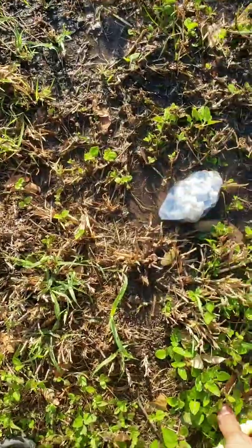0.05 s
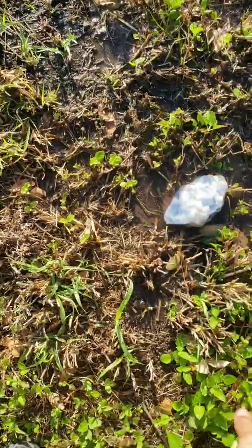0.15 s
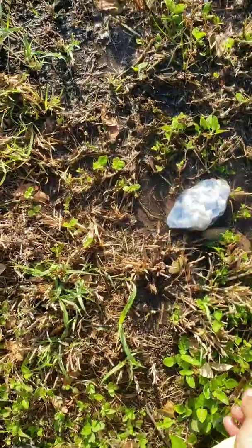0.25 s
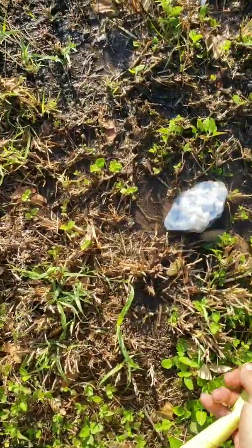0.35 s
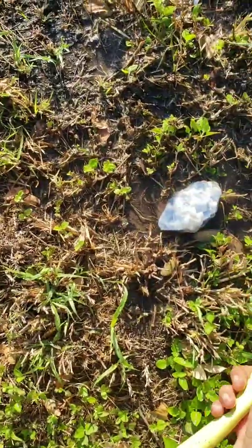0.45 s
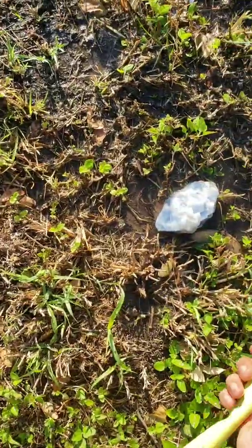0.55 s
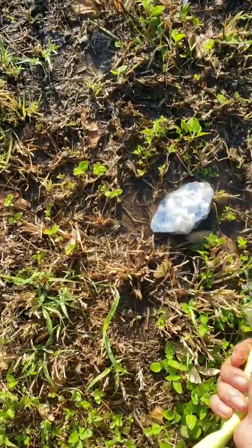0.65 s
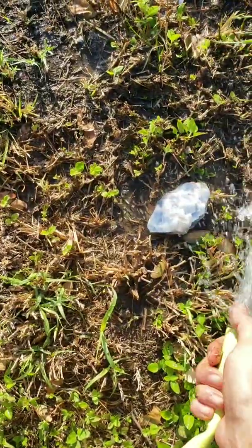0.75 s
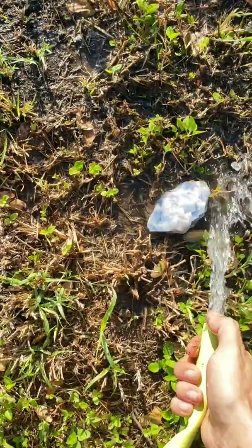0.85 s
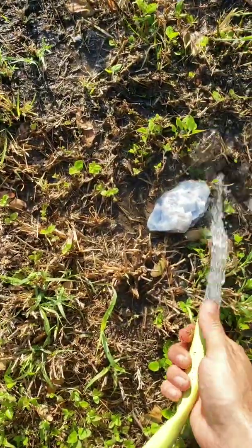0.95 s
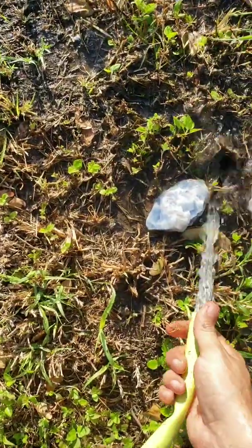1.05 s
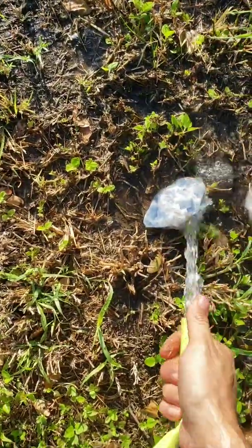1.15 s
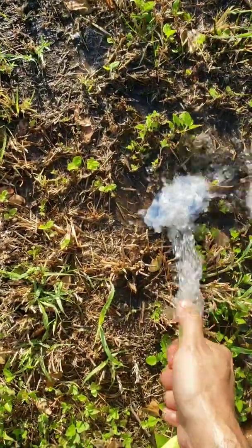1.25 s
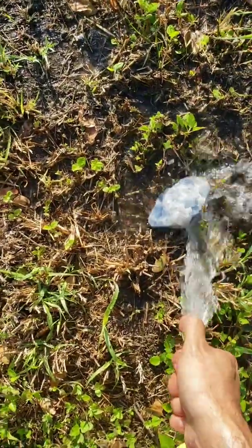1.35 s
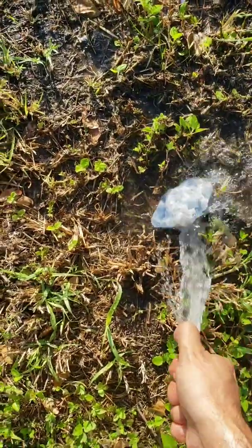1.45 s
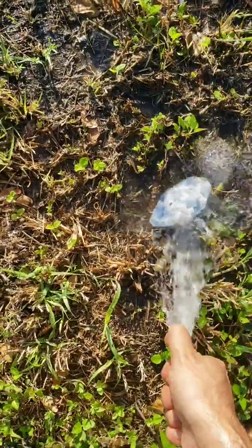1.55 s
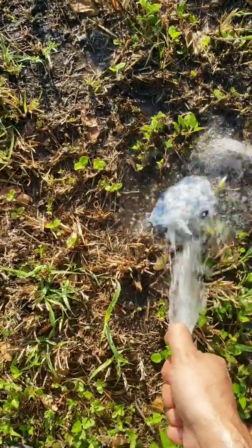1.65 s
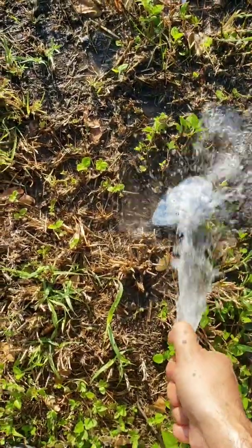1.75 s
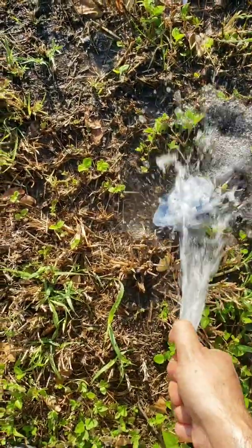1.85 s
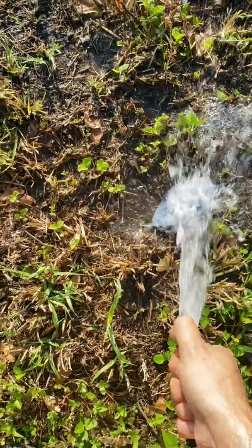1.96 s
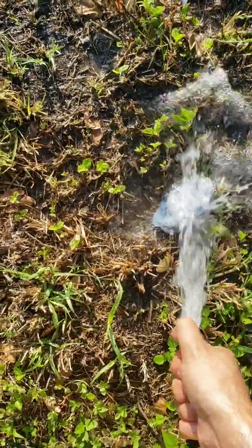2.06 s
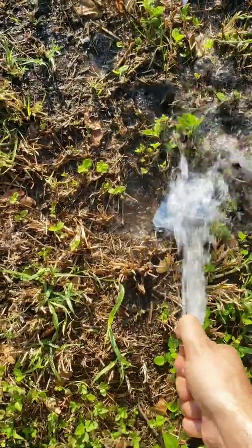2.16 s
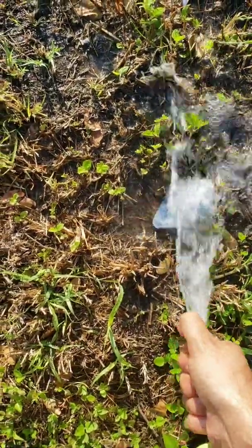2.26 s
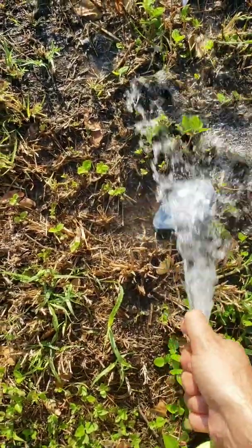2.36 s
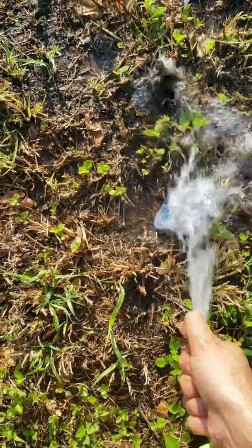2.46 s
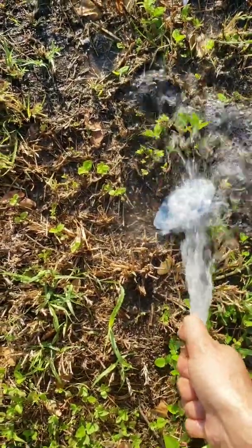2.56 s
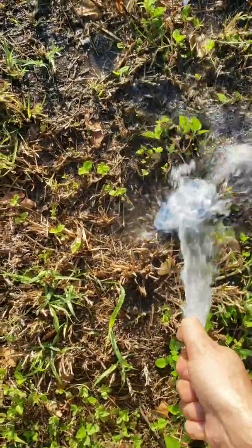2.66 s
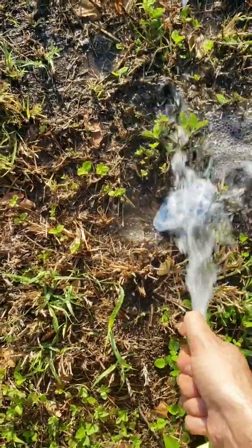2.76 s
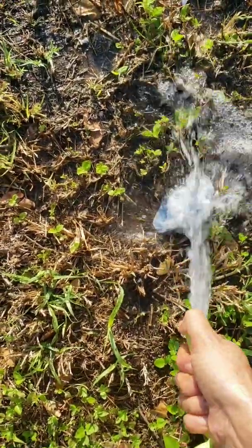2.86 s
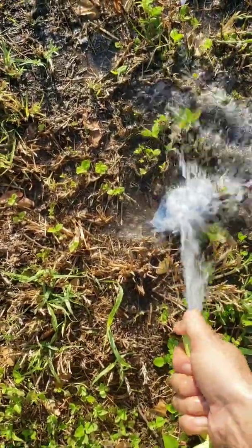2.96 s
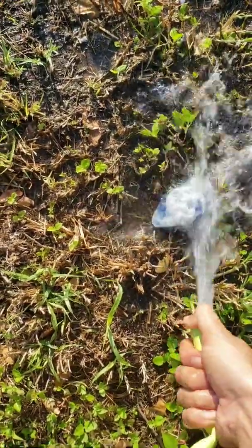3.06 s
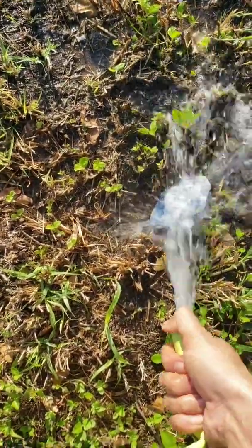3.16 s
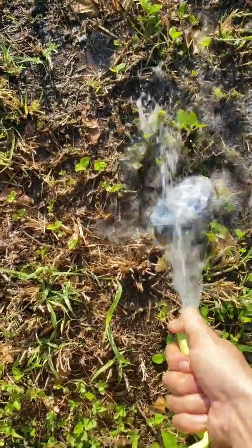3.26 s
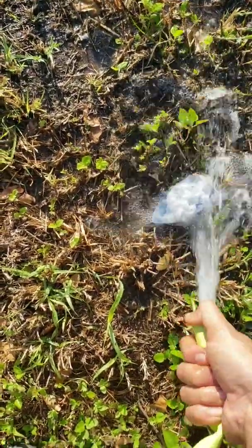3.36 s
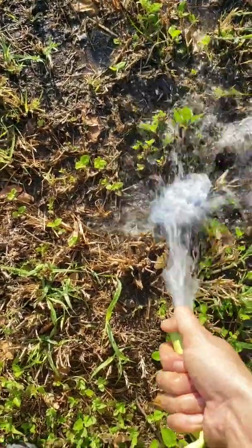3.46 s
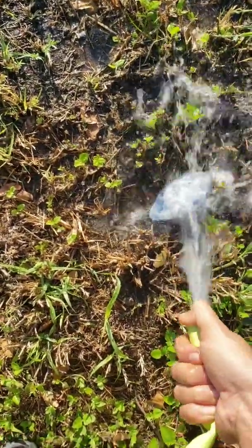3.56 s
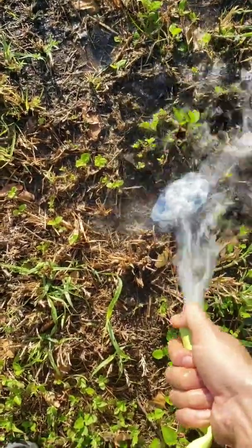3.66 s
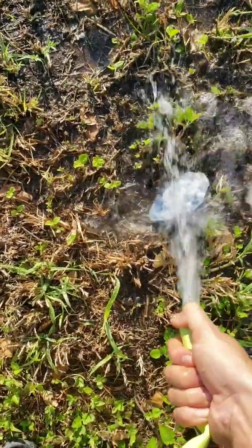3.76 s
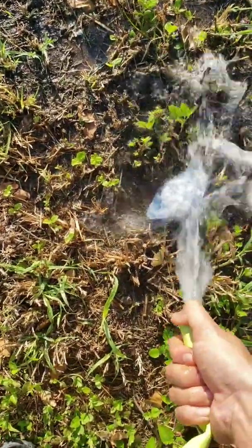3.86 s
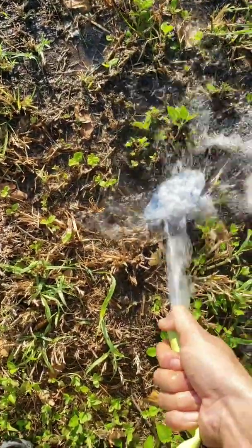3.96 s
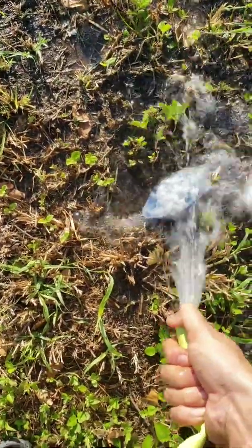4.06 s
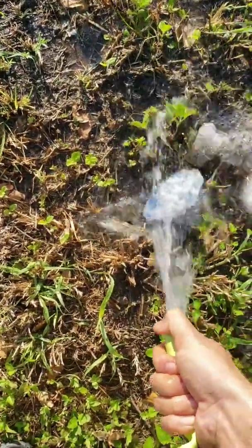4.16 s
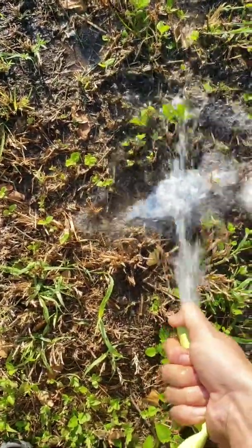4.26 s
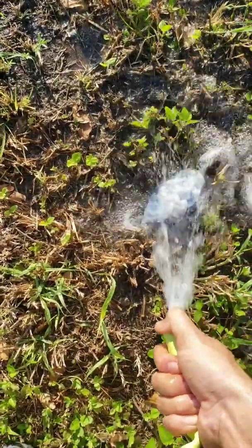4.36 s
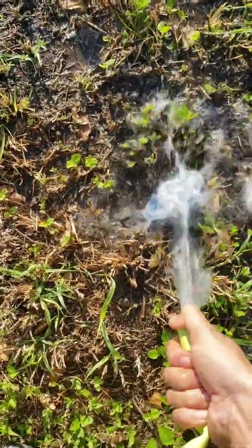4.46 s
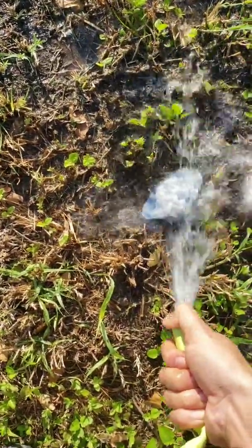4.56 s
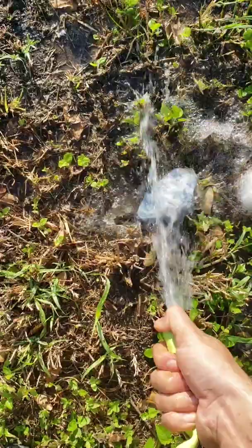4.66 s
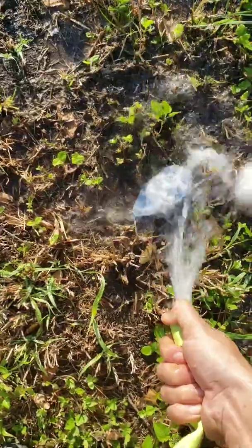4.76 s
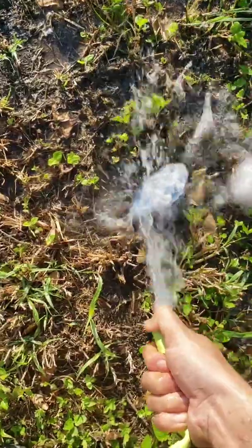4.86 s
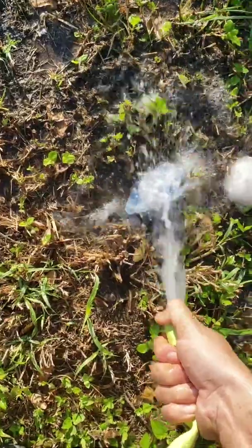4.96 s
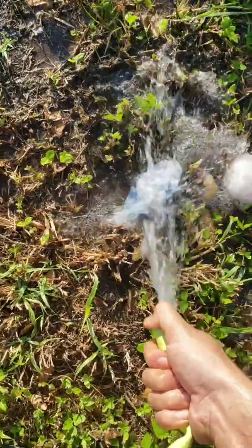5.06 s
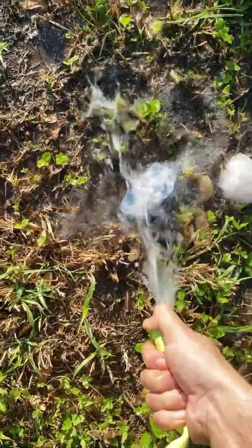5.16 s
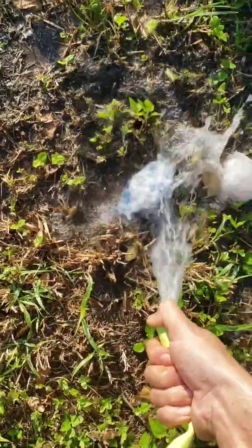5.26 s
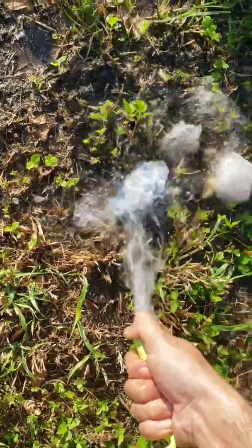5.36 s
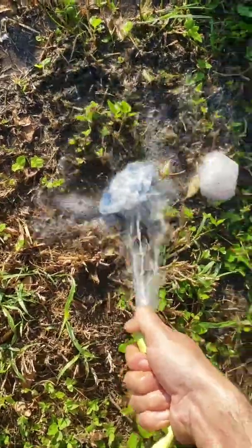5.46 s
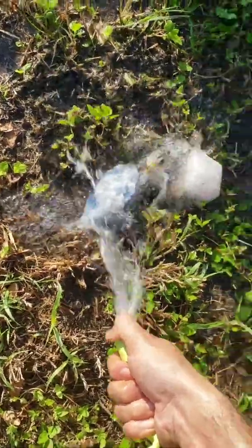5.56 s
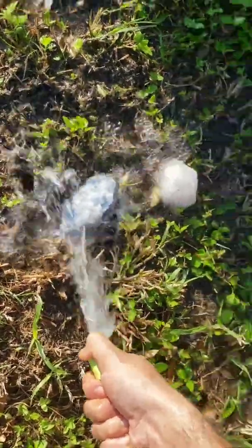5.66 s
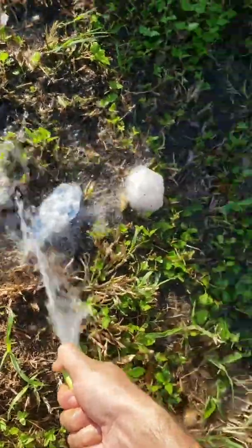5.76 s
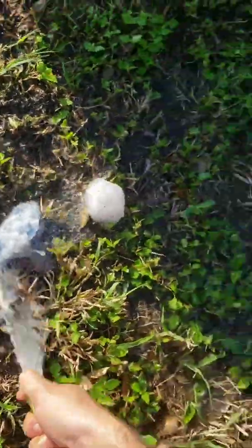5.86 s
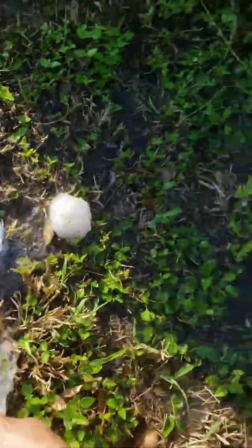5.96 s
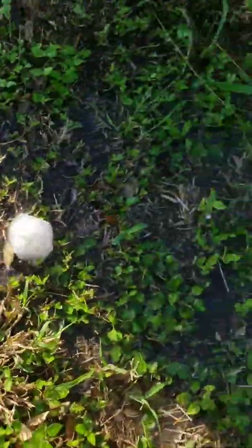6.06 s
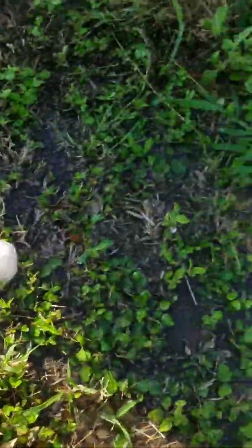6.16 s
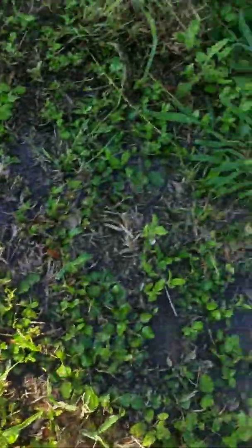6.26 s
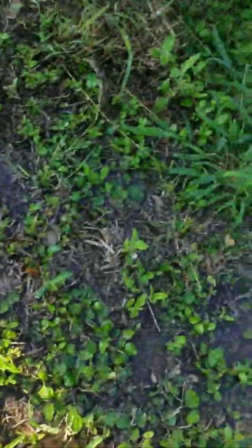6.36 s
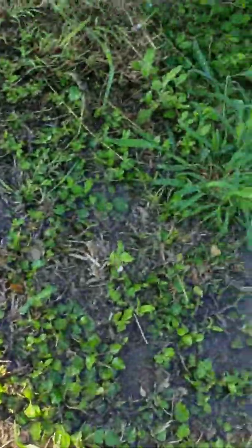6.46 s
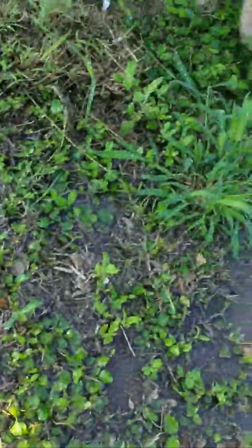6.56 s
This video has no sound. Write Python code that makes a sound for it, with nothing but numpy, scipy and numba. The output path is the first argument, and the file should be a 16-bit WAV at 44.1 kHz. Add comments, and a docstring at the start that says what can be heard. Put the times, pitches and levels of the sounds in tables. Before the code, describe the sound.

Close up outdoors, a garden hose gives a quick gulp, then spits and dribbles with a few dull knocks and separate drops. The water builds into a hard, hissing spray that splashes and bubbles on stone, soil and grass, surging unevenly and easing slightly at the end. Behind it are a faint low rumble, a distant engine gathering speed and light air on the microphone.

```python
"""Garden hose on stone and soil

Outdoors, a phone's two microphones look down on a wet patch of stone, soil and grass. A hose gulps,
spits and dribbles, then sprays hard under a thumb: a cloud of tiny impacts and ringing bubbles.
Near the end the phone turns away. Far off, an engine gathers speed over a low rumble and a faint hum;
close up, light air brushes the microphones."""
import sys
import numpy as np
from scipy import signal
from scipy.fft import rfft, irfft
from scipy.io import wavfile
from scipy.ndimage import uniform_filter1d, map_coordinates
from numba import njit

SR = 44100
rng = np.random.default_rng(int(sys.argv[2]) if len(sys.argv) > 2 else 0)


def wav_record(signal):
    """Record a signal, one row per channel, as 16-bit PCM in the file named by sys.argv[1]."""
    frames = np.transpose(np.atleast_2d(signal))
    bounded = np.clip(frames, -1, 1)
    # unit amplitude maps onto the largest positive 16-bit level
    quanta = np.round(bounded * 32767).astype(np.int16)
    wavfile.write(sys.argv[1], SR, quanta)


N = 291060
TIME = np.arange(N) / SR

# spectra of the distant rumble and of air on the microphones: (frequency [Hz], level [dB])
RUMBLE_COLOUR = [(20, -20), (50, -1.5), (90, 4), (160, -1), (300, -6.5), (450, -11), (700, -32.5),
                 (1500, -31), (4000, -29.5), (9000, -32), (15000, -30)]
BREEZE_COLOUR = [(15, -9), (35, 21), (70, -10), (140, -1), (300, -20)]
PUFF_COLOUR = [(25, -8), (65, 0), (110, -1), (200, -17)]
# puffs of air on the microphones: (peak time [s], half width [s], level [dB])
PUFFS = [(0.203, 0.059, -49), (.66, 0.087, -51), (1.36, .05, -53), (1.97, .1, -57), (2.97, 0.047, -52),
         (3.52, .08, -51), (6.07, 0.11, -51), (6.477, .1, -53)]
# far hum and far engine, as heard in the garden: (time [s], level [dB])
HUM_LEVEL = [(0, -73.5), (4.2, -71.5), (4.7, -67), (6.6, -59.5)]
ENGINE_LEVEL = [(0, -66), (3.8, -65), (4.58, -54.5), (4.8, -53.5), (5.47, -48), (5.95, -55.5), (6.25, -58)]
# engine speed: (time [s], firing rate [Hz])
ENGINE_RATE = [(3.9, 76), (4.6, 85), (5.2, 96), (5.7, 101), (6.6, 105)]
# engine harmonics: (multiple of the firing rate, relative level [dB])
ENGINE_HARMONICS = [(1, -1), (2, -13.5), (3, -12)]

# thumb over the nozzle: (time [s], pinch [0-1])
PINCH = [(1.2, 0), (1.5, 0.29), (1.77, 0.9), (2.2, 0.84), (2.37, .5), (2.57, 1), (3.2, 1), (5.9, 0.89)]
# phone swinging away from the spray: (time [s], turn [0-1])
TURN = [(5.7, 0), (5.95, 0.11), (6.25, .9), (6.6, 0.98)]
# where the water lands in the stereo image: (time [s], lag of the left microphone [ms])
AIM = [(.1, 0.21), (.32, -0.049), (.9, -0.09), (1.6, -0.047)]
# dull low thumps of air or handling, and single big drops: (time [s], level [dB], pitch [Hz], 60 dB decay time
# [s])
BUMPS = [(0.269, -34, 96, .08), (0.296, -29, 91, 0.16), (0.326, -32, 85, 0.22), (0.514, -29, 108, 0.11),
         (0.553, -39, 80, 0.088), (0.609, -33, 114, 0.18), (0.726, -37, 90, 0.097), (0.781, -40, 85, 0.11)]
DROPS = [(.298, -33, 6160, .06), (.511, -21.5, 12200, 0.012), (0.532, -28.5, 1950, .018),
         (.558, -28, 4160, .015), (.615, -31, 14000, .012), (0.7585, -22, 4180, 0.044),
         (0.786, -22.5, 1370, 0.023), (.79, -18.5, 6430, 0.029), (.885, -25.5, 3120, .03),
         (.896, -28, 2520, 0.023), (.934, -25, 6840, .015), (.961, -23, 3620, 0.013),
         (1.019, -25, 1520, .022), (1.021, -21, 12100, 0.016), (1.026, -30.5, 1080, 0.016),
         (1.041, -21, 3230, 0.026), (1.192, -25.5, 1570, 0.033), (1.223, -26, 4470, 0.02),
         (1.376, -22, 4220, .031), (2.1831, -21, 3430, .0054), (2.3204, -17.5, 5140, 0.019),
         (2.3695, -15, 4700, 0.025), (3.505, -14, 3000, 0.0069), (3.686, -13, 2540, .0032),
         (4.0782, -13, 6476, 0.014), (5.2795, -15, 4000, 0.012), (5.281, -20, 2570, .019),
         (5.315, -14, 4300, .008), (5.688, -17, 3730, 0.0087), (6.131, -20, 6460, .017),
         (6.3673, -19, 5000, .01), (6.404, -25, 4460, 0.0061), (6.5696, -17, 3530, 0.013)]
# splash of the steady stream: (time [s], level [dB])
STREAM_LEVEL = [(0.26, -59), (0.34, -51.5), (0.7, -47.5), (0.88, -46.5), (1.36, -46), (1.42, -40.5),
                (1.75, -37.5), (2.6, -37), (2.8, -38), (3.05, -36.5), (4.1, -36), (4.7, -38), (5.05, -37.5),
                (5.2, -39.5), (5.5, -36.5), (5.87, -36.5), (6.05, -40), (6.6, -40.5)]
# heavier slugs of water on top of it:
# (time [s], length [s], splash level [dB], bubbles re splash [dB], spatter and mist re splash [dB])
SLUGS = [(.292, .025, -50, -16, -5), (.385, 0.052, -45.5, -6.5, -10.5), (.478, .02, -50, -12, -17),
         (.527, .04, -44, -16, -15), (.759, 0.058, -40, -11, -2.5), (.93, 0.043, -46.5, -4.5, -13),
         (1.02, 0.057, -45.5, -4.5, -6), (1.16, 0.047, -53.5, 5, -5), (1.32, .03, -52, -18, 7),
         (1.376, 0.035, -40, -24, -3.5), (1.41, 0.13, -48, -1, -13), (2.08, 0.074, -45, -3, 2),
         (2.35, 0.037, -44, -23, -15), (2.68, 0.047, -37, -20, -4), (3.16, 0.039, -44.5, 3, 1),
         (3.39, 0.087, -37, -4.5, -2.5), (3.66, 0.089, -42, -2.5, -1), (3.89, 0.11, -47.5, 4, 4),
         (5.25, 0.087, -36.5, -6.5, -6), (5.43, 0.074, -39, -5, -1.5), (5.67, 0.034, -38.5, -22, -3),
         (6.12, 0.066, -46, -19, 5), (6.35, 0.051, -42, -29, -11), (6.55, .05, -39.5, -26, -5)]
# spectra of the water landing below the phone: (frequency [Hz], level [dB])
SOIL_COLOUR = [(60, -2.5), (130, -1), (250, 0.5), (380, 2), (520, -4.5), (680, -9), (1000, -8)]
BUBBLE_COLOUR = [(600, -35), (720, -10.5), (840, -6), (1150, -3), (1650, -3.5), (2050, -0.5), (2500, 1.5),
                 (2900, -5), (3500, -30)]
SPLASH_COLOUR = [(1700, -11), (2350, -9), (2600, -4), (3050, -5), (3280, -2), (3550, 2), (3900, 0),
                 (4400, 0), (5100, -2), (6200, -21)]
SPATTER_COLOUR = [(4400, -18), (5400, -2.5), (6100, -1), (7300, -1), (7800, -5.5), (8300, -13),
                  (9500, -14.5)]
MIST_COLOUR = [(6800, -6.5), (8200, -5.5), (9300, -6), (10800, -2), (12200, 2.5), (13200, 1.5),
               (15700, 3.5)]
# the two microphone ports ring differently, colouring the side signal: (frequency [Hz], gain [dB])
PORT_DIFFERENCE = [(20, -12), (80, -6.5), (190, -9.5), (370, 0.5), (560, 14), (850, -4), (1330, 5),
                   (1850, -1), (2400, -0.5), (7500, 0.5), (11500, 1.4), (16000, 1.5)]

# settings that follow thumb and phone: (open hose, added by a full pinch, added by the full turn)
BUBBLE_MIX_DB, SPATTER_MIX_DB = (-8.5, 1.7, -10.5), (-3.5, 4.02, -4)  # mixes are against the stream
MIST_MIX_DB, SOIL_MIX_DB = (-2.34, 6.82, -4.5), (-25, 9.33, 4.6)
SPREAD_MS = (0.018, 0.06, -0.043)  # spread of the lag over the wet patch
DROP_SHARE = (.25, .77, -.58)  # share of the full drop rate


def undb(db):
    """Decibels to gain."""
    return 10 ** (np.asarray(db) / 20)


def unit(x):
    """Scale to rms 1."""
    return x / np.sqrt(np.mean(x ** 2))


def curve(table):
    """A table of (time [s], value) as one value per sample."""
    return np.interp(TIME, *np.transpose(table))


def colour(x, points, skirt_db_per_octave=30):
    """Filter by (frequency [Hz], level [dB]) points, falling away past both ends."""
    hz, db = np.transpose(points)
    octave = np.log2(np.maximum(np.fft.rfftfreq(N, 1 / SR), 1))
    outside = np.abs(octave - np.clip(octave, np.log2(hz[0]), np.log2(hz[-1])))
    gain_db = np.interp(octave, np.log2(hz), db) - skirt_db_per_octave * outside
    return irfft(rfft(x) * undb(gain_db), N)


def waver(hz):
    """Glide to a new random value hz times a second; rms 1."""
    hold = max(int(SR / hz), 1)
    steps = rng.standard_normal(N)[np.arange(N) // hold]
    return unit(uniform_filter1d(steps, hold))


def stereo_noise(side_db):
    """Noise at the two microphones, partly shared."""
    mid, side = rng.standard_normal((2, N))
    return mid + undb(side_db) * side * np.array([[1], [-1]])


def low_cut(x, hz=850):
    """Steep high-pass that keeps drops and gulp thin."""
    return signal.sosfilt(signal.butter(6, hz, "high", fs=SR, output="sos"), x)


def outdoors():
    """Low rumble of the neighbourhood, and a light breeze that brushes each microphone on its own."""
    rumble = unit(colour(stereo_noise(side_db=-9), RUMBLE_COLOUR)) * undb(-53.5 + 0.35 * waver(hz=3.6))
    breeze = unit(colour(rng.standard_normal((2, N)), BREEZE_COLOUR)) * undb(-69.5 + 1.9 * waver(hz=2.1))
    return rumble + breeze


def hum(hz=266):
    """A thin tone from far away, wavering in pitch and level."""
    phase = 2 * np.pi * np.cumsum(hz * (1 + .02 * waver(hz=30))) / SR
    return np.sqrt(2) * np.sin(phase) * undb(curve(HUM_LEVEL) + 2.5 * waver(hz=20))


def engine():
    """Only the lowest harmonics of a distant engine reach the garden, wavering on the way."""
    firing_hz = curve(ENGINE_RATE) * (1 + 0.01937 * waver(hz=40))
    phase = 2 * np.pi * np.cumsum(firing_hz) / SR
    db = curve(ENGINE_LEVEL)
    return np.sqrt(2) * sum(np.sin(multiple * phase) * undb(db + relative_db + 1.7 * waver(hz=25))
                            for multiple, relative_db in ENGINE_HARMONICS)


def puffs():
    """Now and then air moves over the phone and buffets each microphone on its own."""
    swell = sum(undb(db) * np.exp(-((TIME - peak) / half_width) ** 2) for peak, half_width, db in PUFFS)
    return unit(colour(rng.standard_normal((2, N)), PUFF_COLOUR)) * swell


def thumps():
    """Each puff of air or knock of handling is a dull, dying low thump, pitched differently at each microphone."""
    out = np.zeros((2, N))
    for start, db, hz, t60 in BUMPS:
        detune = 1 + 0.18 * rng.standard_normal((2, 1))
        age = np.maximum(TIME - start, 0)
        attack = 1 - np.exp(-age / 0.0019)
        decay = np.exp(-np.log(1000) * np.minimum(age / t60, 2))
        out += undb(db) * np.sin(2 * np.pi * hz * detune * age) * attack * decay
    return out


def handling(setting):
    """A setting starts from its open-hose value and follows the thumb's pinch and the phone's turn."""
    open_hose, pinched, turned = setting
    return open_hose + pinched * curve(PINCH) + turned * curve(TURN)


def patch_lag_ms(full_turn_ms=0.286):
    """How much later the left microphone hears the middle of the wet patch."""
    return curve(AIM) + full_turn_ms * curve(TURN)


def from_patch(x):
    """A sound on the wet patch reaches one microphone before the other."""
    lag = patch_lag_ms() * SR / 1000
    return np.array([map_coordinates(x, [np.arange(N) - side * lag / 2], order=3) for side in (1, -1)])


def scatter(x, wash_db, t60, block=256):
    """Stone, soil and leaves throw back a short wash, different for each landing and each microphone."""
    count = N // block + 1
    blocks = np.pad(x, ((0, 0), (0, count * block - N))).reshape(2, count, block)
    age = np.arange(5 * block) / SR
    tails = rng.standard_normal((2, count, len(age))) * np.exp(-np.log(1000) * age / t60)
    tails /= np.sqrt(np.sum(tails ** 2, axis=2, keepdims=True))
    echoes = signal.fftconvolve(blocks, tails, axes=2)
    at = (block * np.arange(count)[:, None] + np.arange(echoes.shape[2])).ravel()
    wash = np.array([np.bincount(at, channel.ravel())[:N] for channel in echoes])  # overlap and add
    # a hard jet wets a wide patch and washes more than a dribble
    flow = np.clip(handling(DROP_SHARE), 0, 1)
    return x + undb(wash_db) * np.sqrt(flow) * wash


def soil():
    """Soft ground takes the weight of the jet with an uneven patter."""
    thud = colour(stereo_noise(side_db=-15), SOIL_COLOUR)
    patter = thud * undb(2.26 * waver(hz=50) + 1.8 * waver(hz=160))
    return unit(patter) * undb(curve(STREAM_LEVEL) + handling(SOIL_MIX_DB))


def gulp(peak_s=.2125, lead_s=.011, leap_s=0.00262, low_hz=880, high_hz=3600, fizz_db=-9):
    """An air pocket shrinks as water drives it out of the hose, so its note leaps up; droplets fizz."""
    age = TIME - peak_s
    leap = (1 + np.tanh(age / leap_s / 2)) / 2
    hz = low_hz * (high_hz / low_hz) ** leap
    note = np.sin(2 * np.pi * np.cumsum(hz * (1 + 0.106 * waver(hz=1900))) / SR)
    band = signal.butter(3, [1500, 5000], "band", fs=SR, output="sos")
    fizz = unit(signal.sosfilt(band, rng.standard_normal(N)))
    db = -35 + np.minimum(1000 * age, -850 * age)  # rise and fall in dB/s, loudest mid-leap
    squirt = (note + undb(fizz_db) * fizz) * undb(np.maximum(db, -200)) * (age > -lead_s)
    return low_cut(scatter(from_patch(squirt), wash_db=-2, t60=.05))


def big_drops(slap_gain=2.5, band_ratio=1.24, glide=0.039):
    """A big drop slaps, then the pocket of air under it rings briefly, rising in pitch."""
    age = np.arange(SR // 10) / SR
    out = np.zeros(N + len(age))
    for start, db, hz, t60 in DROPS:
        noise = rng.standard_normal(len(age))
        slap = slap_gain * noise * np.exp(-age / 0.00025)
        edges_hz = [hz / band_ratio, min(hz * band_ratio, SR / 2 - 1)]
        splash = unit(signal.sosfilt(signal.butter(2, edges_hz, "band", fs=SR, output="sos"), noise))
        bubble = np.sin(2 * np.pi * hz * age * (1 + glide * np.minimum(age / t60, 1)))
        drop = slap + (splash + 1.2 * bubble) * np.exp(-np.log(1000) * age / t60)
        at = int(start * SR)
        out[at:at + len(age)] += undb(db) * drop / np.abs(drop).max()
    return low_cut(scatter(from_patch(out[:N]), wash_db=1, t60=0.04))


@njit
def ring(start, hz, cycles, size, glide):
    """Add up damped sines that start between samples and glide upward as they fade by 50 dB."""
    out = np.zeros(N)
    for k in range(len(start)):
        length = cycles[k] * SR / hz[k]
        for i in range(max(int(start[k]) + 1, 0), min(int(start[k] + length) + 1, N)):
            progress = (i - start[k]) / length
            phase = 2 * np.pi * cycles[k] * progress * (1 + glide * progress / 2)
            out[i] += size[k] * np.exp(-5.76 * progress) * np.sin(phase)
    return out


def cloud(low_hz, high_hz, cycles, size_db, glide, width, patchy_db, count):
    """Droplets of random size land over the wet patch, each with its own lag between the microphones."""
    when, pitch, damping, size_rank, chance = rng.random((count, 5)).T
    place, pan = rng.standard_normal((2 * count,)).reshape(count, 2).T
    at = (when * N).astype(int)
    hz = low_hz + (high_hz - low_hz) * pitch
    # most are dry ticks; a few trap a bubble that rings on
    ring_cycles = cycles * (.3 - .8 * np.log(damping + .02))
    # each slug of water favours drops of certain sizes, so the colour keeps shifting
    favour = map_coordinates(rng.standard_normal((160, 6)), [159 * when, 5 * pitch], order=1)
    heard = chance < handling(DROP_SHARE)[at]
    # sizes have a long tail; a short high tick needs more height for the same energy
    size = undb(patchy_db * favour - size_db * np.log(size_rank + 0.015)) * np.sqrt(hz) * heard
    lag = (patch_lag_ms()[at] + width * handling(SPREAD_MS)[at] * place) * SR / 1000
    return np.array([ring(when * N + side * lag / 2, hz, ring_cycles, size * undb(side * 2 * pan), glide)
                     for side in (1, -1)])


def at_level(x, db):
    """Bring a cloud to a running level, however few its droplets are."""
    power = uniform_filter1d(x.mean(axis=0) ** 2, SR // 6)
    return x * undb(db) / np.sqrt(np.maximum(power, 0) + 1e-3 * power.mean())


def water_levels(attack_s=.005, release_s=.018):
    """Running dB of splash, bubbles, spatter and mist: the stream, plus slugs that hit, hold, drain."""
    stream_db = curve(STREAM_LEVEL)
    others_db = [stream_db + handling(mix) for mix in (BUBBLE_MIX_DB, SPATTER_MIX_DB, MIST_MIX_DB)]
    power = undb([stream_db] + others_db) ** 2
    for start, length, db, bubble_db, fine_db in SLUGS:
        age = TIME - start
        envelope = np.clip(age / attack_s, 0, 1) * np.exp(-np.clip((age - length) / release_s, 0, 20))
        gains = undb(db + np.array([0, bubble_db, fine_db, fine_db]))
        power += np.outer(gains, envelope) ** 2
    return 10 * np.log10(power)


def spray():
    """The jet breaks into slugs that whip up bubbles, splash, spatter on stone and throw off mist."""
    flutter = 0.37 * waver(hz=54) + 0.34 * waver(hz=150)
    bubbles = cloud(684, 2843, cycles=11.9, size_db=-1, glide=.13, width=.57, patchy_db=1.5, count=20000)
    splash = cloud(2073, 5790, cycles=12.6, size_db=2, glide=.18, width=.85, patchy_db=1.85, count=45000)
    spatter = cloud(4240, 8900, cycles=4.6, size_db=2, glide=.05, width=.93, patchy_db=1.7, count=40000)
    mist = cloud(5800, 18300, cycles=4, size_db=0, glide=0.0, width=.24, patchy_db=1.5, count=70000)
    bubbles = colour(scatter(bubbles, wash_db=-6.5, t60=.043), BUBBLE_COLOUR) * undb(0.6 * flutter)
    splash = colour(scatter(splash, wash_db=-5, t60=.035), SPLASH_COLOUR) * undb(0.8 * flutter)
    spatter = colour(scatter(spatter, wash_db=3, t60=.041), SPATTER_COLOUR) * undb(1.1 * flutter)
    mist = colour(scatter(mist, wash_db=8.5, t60=.031), MIST_COLOUR) * undb(0.27 * flutter)
    water_on = np.interp(TIME, [.215, .25], [0, 1])
    layers = zip((splash, bubbles, spatter, mist), water_levels())
    return water_on * sum(at_level(layer, db) for layer, db in layers)


def scene():
    """Hose and water below the phone, the neighbourhood far off, air right on the microphones."""
    hose = spray() + soil() + big_drops() + gulp() + thumps()
    return hose + engine() + hum() + outdoors() + puffs()


def record(dry, top_hz=15750):
    """The ports colour the side signal, the left microphone is a touch hotter, the phone cuts the top."""
    left, right = dry
    mid = (left + right) / 2
    side = colour((left - right) / 2, PORT_DIFFERENCE)
    stereo = np.array([mid + side, mid - side]) * undb([[.2], [-.2]])
    return signal.sosfilt(signal.ellip(12, .1, 75, top_hz, fs=SR, output="sos"), stereo)


dry = scene()
out = record(dry)
wav_record(out)
```